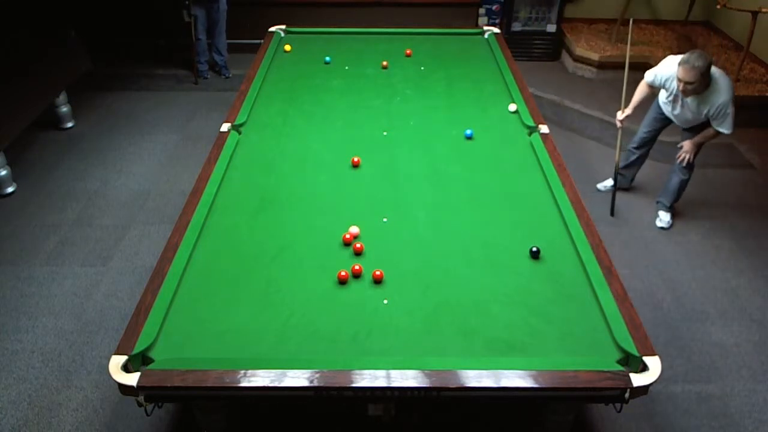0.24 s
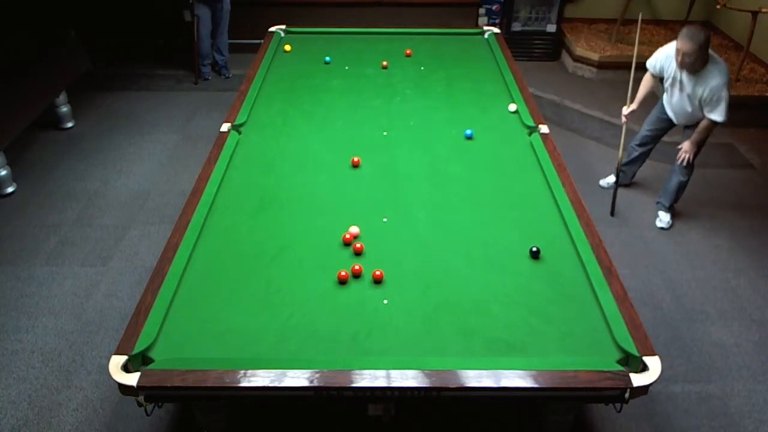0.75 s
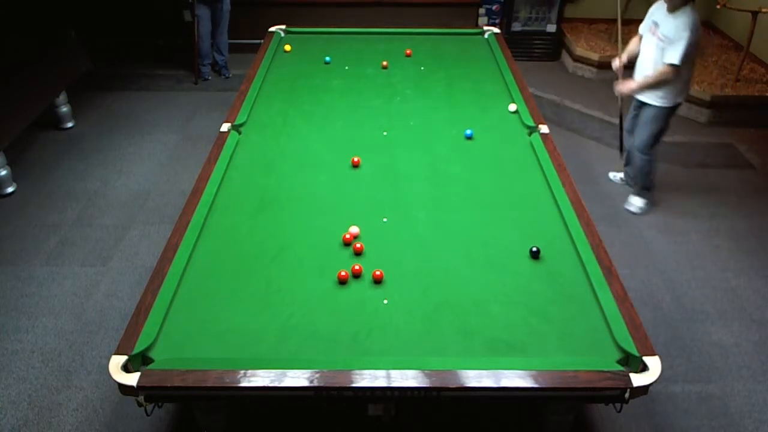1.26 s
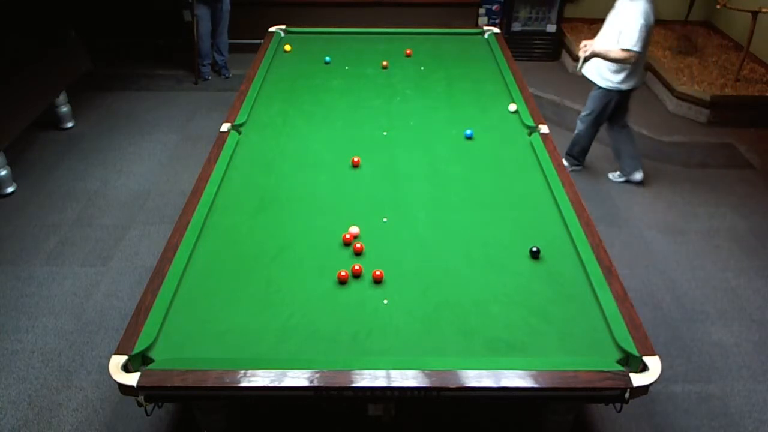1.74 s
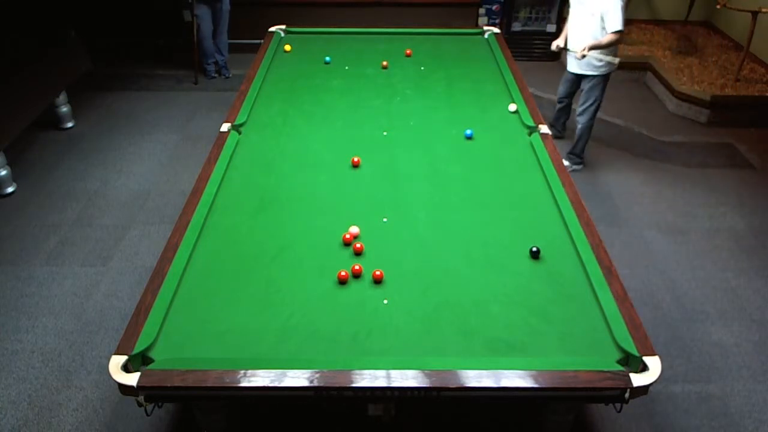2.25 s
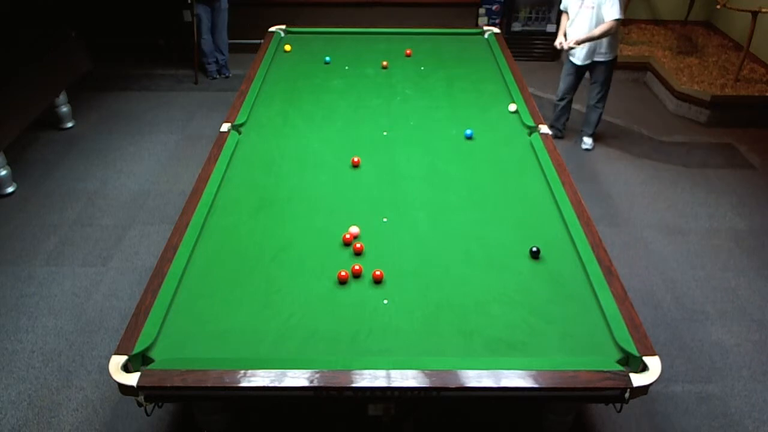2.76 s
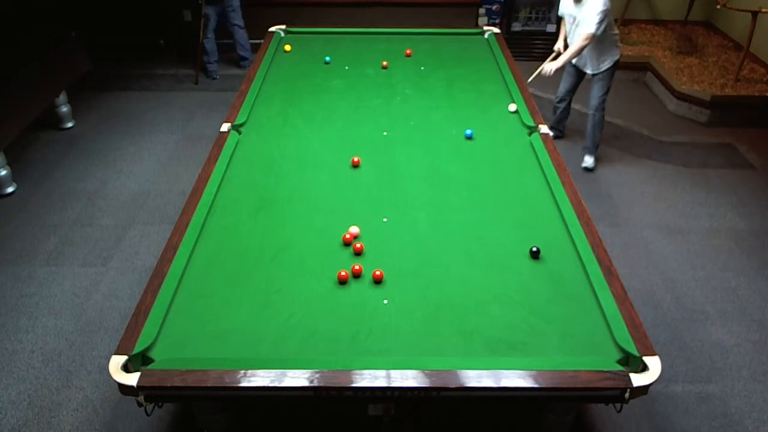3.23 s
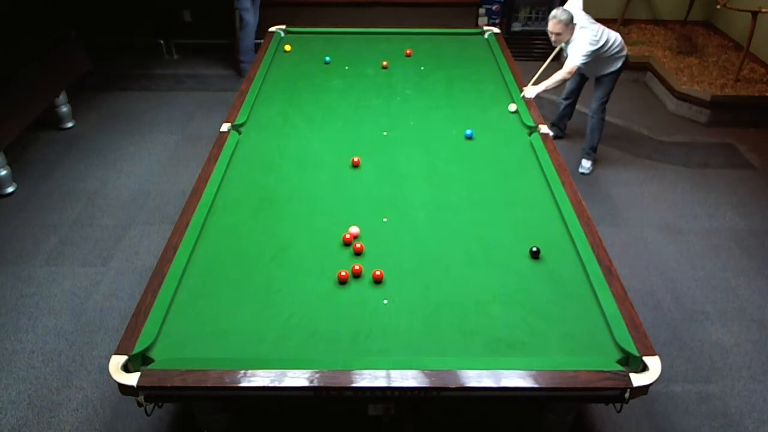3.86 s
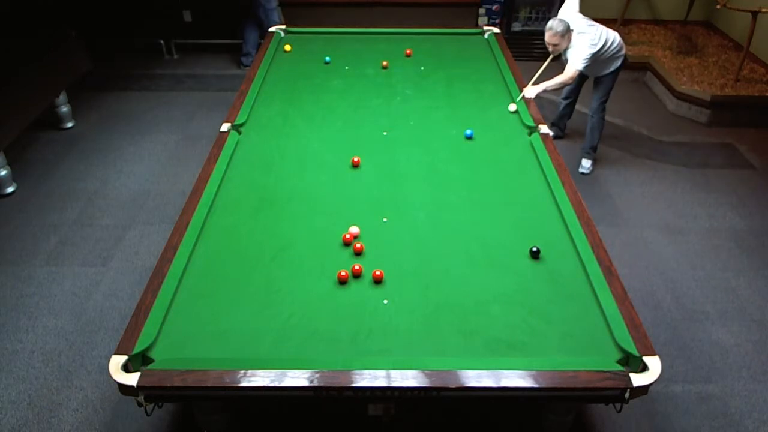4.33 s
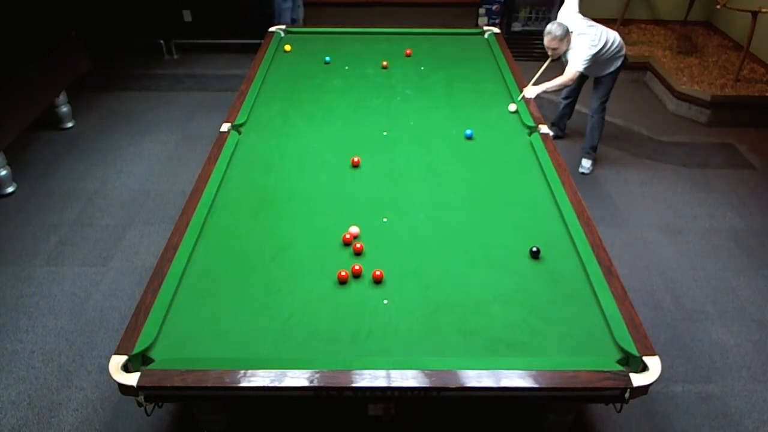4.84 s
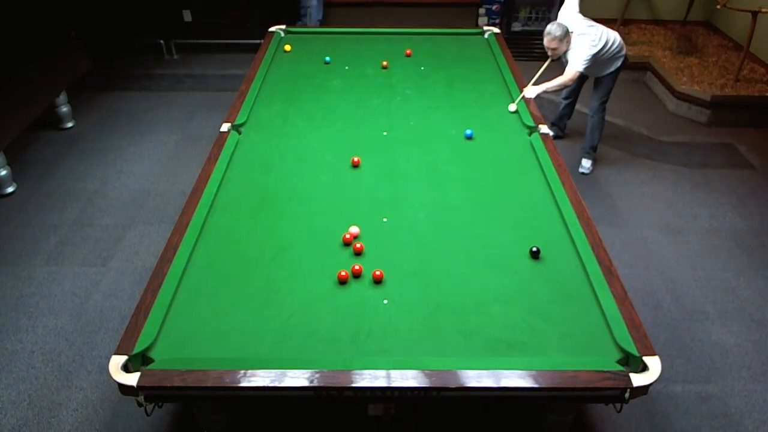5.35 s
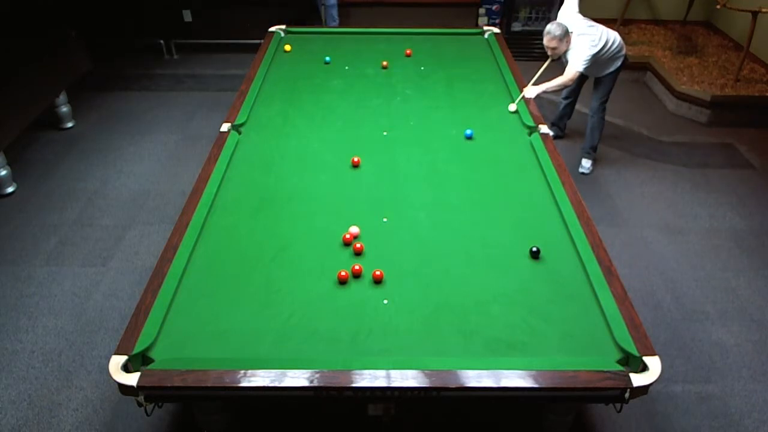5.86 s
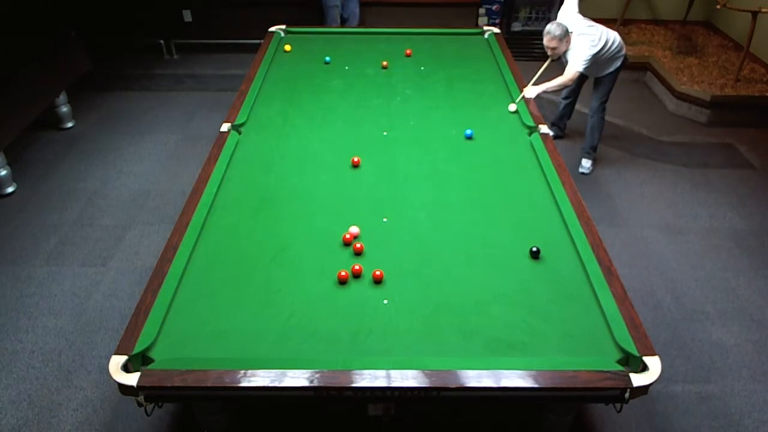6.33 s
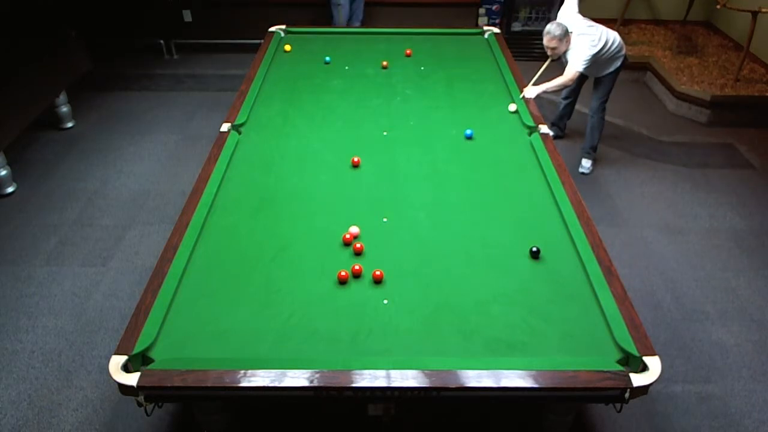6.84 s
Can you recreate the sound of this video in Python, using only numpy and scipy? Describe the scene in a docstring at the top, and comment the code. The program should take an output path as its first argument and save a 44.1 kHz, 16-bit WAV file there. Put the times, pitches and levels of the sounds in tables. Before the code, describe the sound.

Quiet snooker club with low throbbing ventilation, soft carpet footsteps and cloth rustle, then a woody cue knock and a loud sharp ball crack.

```python
"""A snooker shot in a quiet club: the cue knocks the white, which cracks into another ball an eighth of a
second later. Both contacts are short decaying modes with discrete echoes and a diffuse noise tail. Before the
shot the player walks round the table: thuds, carpet scuffs and rustling clothes (shaped noise). Ventilation
runs throughout: coloured noise and wavering tones; low throbs come and go irregularly. Swishes and a bright
hiss, both band-shaped noise, follow the shot."""
import sys
import numpy as np
from scipy import signal
from scipy.fft import rfft, irfft, next_fast_len
from scipy.io import wavfile
from scipy.ndimage import uniform_filter1d, map_coordinates

SR = 44100
rng = np.random.default_rng(int(sys.argv[2]) if len(sys.argv) > 2 else 0)


def inscribe(sig):
    """Save sig as 16-bit PCM at rate SR to the path in sys.argv[1].

    A 1-D sig is mono; a 2-D sig holds one channel per row.
    Samples are clipped to [-1, 1] before scaling.
    """
    pcm = np.round(np.clip(np.atleast_2d(sig).T, -1, 1) * 32767)
    wavfile.write(sys.argv[1], SR, pcm.astype(np.int16))


N = 312669

SUPPRESS_DB = 6.5  # greatest cut of the noise suppressor

# modes of the struck cue: (frequency [Hz], level [dB], t60 [s])
CUE_MODES = [(1096, -15, 0.15), (1389, -15.5, .13), (1920, -25, .5), (2370, -27.5, .2), (2500, -1, 0.011),
             (2820, -25.5, .15), (3620, -10, 0.0039)]


def from_db(db):
    """Decibels to amplitude gain."""
    return 10 ** (np.asarray(db) / 20)


def seconds():
    """Time of every sample."""
    return np.arange(N) / SR


def at_hz(points, hz):
    """Interpolate a table along log frequency."""
    point_hz, value = np.transpose(points)
    return np.interp(np.log(hz + 1e-3), np.log(point_hz), value)


def pan(left_right_db):
    """Gains of the two channels for a given level difference."""
    return from_db(np.array([[left_right_db], [-left_right_db]]) / 2)


def noise(colour, side_db):
    """Coloured stereo noise, steep beyond the table's ends, narrower in the treble; mid rms 1."""
    wide_below_hz = 1300
    size = next_fast_len(N)
    hz = np.arange(size // 2 + 1) * SR / size + 0.00091
    low_end = 1 + (colour[0][0] / hz) ** 8
    high_end = 1 + (hz / colour[-1][0]) ** 16
    gain = from_db(at_hz(colour, hz)) / np.sqrt(low_end * high_end)
    white = rng.standard_normal((2, size))
    mid, side = irfft(rfft(white) * gain, size)[:, :N]
    side = signal.sosfilt(signal.butter(2, wide_below_hz, fs=SR, output="sos"), side)
    return (mid + from_db(side_db) * side * [[1], [-1]]) / mid.std()


def drift(knots_per_s):
    """Random knots joined by straight lines."""
    knots = rng.standard_normal(4096)
    return map_coordinates(knots, [seconds() * knots_per_s], order=1, mode="wrap")


def by_chance(per_s, db, spread_db, hz, octaves):
    """Rows of (s, dB, Hz) at uneven intervals, scattered in level and pitch."""
    gap, loud, high = rng.uniform(-1, 1, (100, 3)).T
    top_s = np.cumsum(1 + gap / 2) / per_s
    rows = np.transpose([top_s, db + spread_db * loud, hz * 2 ** (octaves * high)])
    return rows[rows[:, 0] < N / SR]


def swells(rows, rise_s, fall_s):
    """Tones under two-sided Gaussian envelopes, from rows of (s, dB, Hz)."""
    out = np.zeros(N)
    for top_s, db, hz in rows:
        top = int(top_s * SR)
        span = np.arange(max(top - SR // 10, 0), min(top + SR // 10, N))
        age = span / SR - top_s
        swell = np.exp(-(age / np.where(age < 0, rise_s, fall_s)) ** 2)
        out[span] += from_db(db) * swell * np.cos(2 * np.pi * (hz * age + rng.random()))
    return out


def stroke(top_s, db, rise_s, fall_s):
    """Strength of a rub: Gaussian rise to its top, exponential fall."""
    age = seconds() - top_s
    return from_db(db) * np.exp(-np.where(age < 0, (age / rise_s) ** 2, age / fall_s))


def rubbing(strengths, colour, grain_db, side_db):
    """Noise with uneven grain; overlapping strokes add in power."""
    strength = np.sqrt(sum(s ** 2 for s in strengths))
    grain = from_db(grain_db * drift(250))
    return strength * grain * noise(colour, side_db)


def ventilation(waver_db):
    """Dull moving air as coloured noise, plus wavering tones and a thin whine that creeps in."""
    # air noise: (frequency [Hz], density [dB per Hz])
    air_colour = [(40,-29.5), (85,-13), (128,3), (170,-5.5), (290,-5.5), (600,-10), (1150,-17), (1450,-26),
                  (2700,-28.5), (3400,-35.5), (4200,-31), (5500,-34.5), (6200,-42.5), (9000,-48),
                  (15000,-57)]
    # wavering tones: (frequency [Hz], level [dB])
    hum_tones = [(118, -65.5), (138, -63.5), (272, -66.5), (358, -70), (550, -69.5)]
    air_db = -57.0
    whine_hz, whine_db, whine_fade_in_s = 8030, -91.5, 2.8
    t = seconds()
    out = from_db(air_db) * noise(air_colour, side_db=-14.5)
    for hz, db in hum_tones:
        level = from_db(db + waver_db * drift(8.5))
        out = out + level * np.sin(2 * np.pi * hz * t + 0.34 * drift(4.6))
    whine_level = from_db(whine_db + waver_db * drift(7.3)) * np.minimum(t / whine_fade_in_s, 1)
    out = out + whine_level * np.sin(2 * np.pi * whine_hz * t)
    return out * pan(-2.5)


def throbs():
    """Low swells at one pitch come and go unevenly: listed strong throbs, random weak ones."""
    # strong throbs: (time of top [s], level [dB])
    throb_rows = [(0.008, -32.5), (0.057, -36), (0.164, -39), (0.354, -40.5), (1.119, -39.5),
                  (1.868, -39.5), (1.91, -41), (1.982, -42), (2.202, -42.5), (2.563, -34.5), (2.609, -39),
                  (3.25, -40), (3.306, -40), (3.655, -41.5), (4.356, -40), (4.415, -36.5), (5.054, -38.5),
                  (5.159, -39), (5.555, -39.5), (5.805, -41.5), (5.854, -40.5), (6.099, -42), (6.15, -37),
                  (6.505, -37.5), (6.605, -41), (6.795, -40), (6.904, -35.5), (7.019, -40.5)]
    throb_hz, rise_s, fall_s = 127.3, 0.014, 0.011
    strong = [(top_s, db, throb_hz) for top_s, db in throb_rows]
    weak = by_chance(per_s=3, db=-51, spread_db=2, hz=throb_hz, octaves=0)
    return swells([*strong, *weak], rise_s, fall_s) * pan(-1.0)


def clothes():
    """Cloth friction: broadband noise swelling with each movement, over a faint floor."""
    # movements: (time of top [s], level [dB], length [s])
    moves = [(0.057, -72, .2), (.86, -72.5, 0.13), (1.4, -71.5, 0.33), (1.516, -67, 0.08),
             (1.82, -74.5, 0.22), (2.412, -70, 0.23), (2.75, -77.5, .2), (3.079, -71, .04),
             (3.328, -75.5, .35), (6.319, -77, .2)]
    # cloth noise: (frequency [Hz], density [dB per Hz])
    cloth_colour = [(1000, -2.5), (2500, 0), (3400, -7), (5000, -1), (7000, -10), (10000, -19.5),
                    (14000, -28.5)]
    rise_share, fall_share = 0.77, 1.4  # of a movement's length
    still_db = -83.5
    strengths = [stroke(top_s, db, rise_share * length_s, fall_share * length_s)
                 for top_s, db, length_s in moves]
    return rubbing(strengths + [from_db(still_db)], cloth_colour, grain_db=0.5, side_db=-31.5)


def scuff(top_s, db, length_s, centre_hz):
    """A sole brushes the carpet: noise in a band round its own pitch."""
    # band shape: (multiple of the centre [ratio], density [dB per Hz])
    band_shape = [(.5, -27), (.88, 0), (1.2, -3), (1.45, -23), (1.8, -50)]
    rise_share, fall_share = 0.8, 1.6  # of the scuff's length
    strength = stroke(top_s, db, rise_share * length_s, fall_share * length_s)
    colour = [(centre_hz * multiple, level_db) for multiple, level_db in band_shape]
    return rubbing([strength], colour, grain_db=1.0, side_db=-19)


def footsteps():
    """Dull thuds, mostly feet on the carpeted floor, as brief low tones; soles scuff as noise."""
    # thuds: (time of top [s], level [dB], frequency [Hz])
    thud_rows = [(0.778, -48, 350), (0.864, -45, 355), (1.438, -46, 363), (1.545, -44, 366),
                 (1.895, -42.5, 275), (2.196, -46.5, 352), (3.335, -39, 250), (3.455, -38.5, 269),
                 (4.02, -47, 279.4), (4.378, -42, 275)]
    # carpet scuffs: (time of top [s], level [dB], length [s], centre [Hz])
    scuff_rows = [(1.404, -55.5, 0.026, 1130), (1.486, -56, 0.032, 1330), (1.528, -56, .022, 1400),
                  (1.568, -56, 0.035, 1140)]
    rise_s, fall_s = 0.011, 0.023
    weak = by_chance(per_s=2.5, db=-51.5, spread_db=2, hz=261, octaves=0.35)
    thuds = swells([*thud_rows, *weak], rise_s, fall_s) * pan(-0.8)
    return thuds + sum(scuff(*row) for row in scuff_rows)


def swishes():
    """Narrow-band noise, quick to swell and slower to fade."""
    # swishes: (time of top [s], level [dB])
    swish_rows = [(6.38, -48), (6.785, -66.5)]
    # swish band: (frequency [Hz], density [dB per Hz])
    swish_colour = [(1300, -32), (1900, -2.5), (2400, 1), (2800, -5), (3500, -17.5), (4400, -30.5)]
    rise_s, fall_s = 0.018, 0.063
    strengths = [stroke(top_s, db, rise_s, fall_s) for top_s, db in swish_rows]
    return rubbing(strengths, swish_colour, grain_db=1.7, side_db=-25)


def hiss():
    """Bright noise with linear attack, short hold and Gaussian release."""
    # the hiss: (start [s], level [dB])
    start_and_level = (6.457, -46.5)
    # hiss noise: (frequency [Hz], density [dB per Hz])
    hiss_colour = [(1000, -49), (1700, -15), (2420, -2.5), (2690, -0.5), (2960, -11), (4490, 0),
                   (6380, -2.5), (6970, -9), (7890, -4), (10700, -17.5), (14000, -44)]
    attack_s, hold_s, release_s = 0.04, 0.015, 0.056
    start_s, db = start_and_level
    age = seconds() - start_s
    attack = np.clip(age / attack_s, 0, 1)
    release = np.exp(-(np.maximum(age - attack_s - hold_s, 0) / release_s) ** 2)
    return rubbing([from_db(db) * attack * release], hiss_colour, grain_db=0.5, side_db=-35)


def ring(modes, start_s, contact_s):
    """Decaying sines that swell while the contact lasts."""
    age = np.arange(SR // 2) / SR
    sound = sum(from_db(db - 60 * age / t60) * np.sin(2 * np.pi * hz * age) for hz, db, t60 in modes)
    out, first = np.zeros(N), int(start_s * SR)
    out[first:first + len(age)] = sound * (1 - np.exp(-(age / contact_s) ** 2))
    return out


def delayed(x, lag_s):
    """The same sound, later."""
    return np.interp(seconds() - lag_s, seconds(), x, left=0)


def hall(start_s, colour, side_db, build_s, hold_s, end_s, grain_db):
    """Diffuse echoes build up, hold briefly, then decay at a rate set by frequency."""
    # hall decay: (frequency [Hz], t60 [s])
    hall_t60 = [(250, 1), (700, 0.52), (1300, 0.6), (2200, 0.73), (3500, 0.48), (5000, 0.41), (6800, 0.18),
                (14000, .3)]
    wash = noise(colour, side_db)[:, :SR]
    hz, t, cells = signal.stft(wash, SR, nperseg=256)
    decay = from_db(-60 * np.maximum(t - hold_s, 0) / at_hz(hall_t60, hz)[:, None])
    tail = signal.istft(cells * decay, SR)[1][:, :SR]
    out, first = np.zeros((2, N)), int(start_s * SR)
    out[:, first:first + SR] = tail
    age = np.maximum(seconds() - start_s, 0)
    build = 1 - np.exp(-age / build_s)
    end = 1 / (1 + (age / end_s) ** 10)
    return out * build * end * from_db(grain_db * drift(500))


def blow(start_s, direct_db, modes, right_cut_db, echo_db, contact_s):
    """A contact heard direct, mostly at the left, then low-passed off the nearest surfaces."""
    # first echoes off table, lamp and walls: (delay [s], level [dB], left minus right [dB])
    first_echoes = [(.0054, -10, 1.5), (.0078, -17, 9.5), (0.0098, -8, 6), (0.0181, -16.5, 0),
                    (0.0183, -10, -2), (0.0305, -13, -4.5), (.042, -15, -5.5), (0.0491, -21, -3),
                    (0.073, -17, -1)]
    click = from_db(direct_db) * ring(modes, start_s, contact_s)
    dull = signal.sosfilt(signal.butter(4, 4800, fs=SR, output="sos"), click)
    echoes = sum(from_db(db + echo_db) * pan(left_right_db) * delayed(dull, lag_s)
                 for lag_s, db, left_right_db in first_echoes)
    return click * from_db([[0], [-right_cut_db]]) + echoes


def balls():
    """Two hard balls meet: a very short crack that fills the hall; the table bed thuds faintly."""
    # ball on ball: (time [s], direct level [dB], hall level [dB])
    contact = (5.5902, 8.5, -19.5)
    # tones of the crack: (frequency [Hz], level [dB], t60 [s])
    crack_tones = [(1300, -22, .008), (2160, -8.5, 0.0091), (2672, 0, .006), (3680, -10, .004),
                   (8070, -6.5, 0.0022), (12460, -26, 0.0012)]
    # modes of the table bed: (frequency [Hz], level [dB], t60 [s])
    bed_modes = [(189.2, -36.5, 0.12), (271, -34, 0.15), (335, -38, 0.13)]
    # crack in the hall: (frequency [Hz], density [dB per Hz])
    crack_colour = [(200,-16), (420,-26.5), (900,-5.5), (1130,-2.5), (1600,-5.5), (2100,1), (2700,0),
                    (3230,-7), (4200,-10), (5200,-20.5), (6000,-36.5), (8000,-40), (11000,-50),
                    (15000,-61.5)]
    glint_above_hz, glint_db = 6500, -9  # the glassy top also reaches the right side
    contact_s = 0.00028
    start_s, direct_db, hall_db = contact
    crack = blow(start_s, direct_db, crack_tones, right_cut_db=12.0, echo_db=-8.0, contact_s=contact_s)
    glint_modes = [mode for mode in crack_tones if mode[0] > glint_above_hz]
    glint = from_db(direct_db + glint_db) * ring(glint_modes, start_s, contact_s)
    bed = ring(bed_modes, start_s, contact_s=0.0018)
    wash = hall(start_s, crack_colour, side_db=-15, build_s=0.013, hold_s=0.032, end_s=0.34, grain_db=2.0)
    return crack + glint * [[0], [1]] + bed + from_db(hall_db) * pan(0.4) * wash


def shaft(x, width_hz, lift_db):
    """Narrow resonances at the modes of the cue."""
    peaks = [signal.iirpeak(hz, hz / width_hz, SR) for hz, _, _ in CUE_MODES]
    return from_db(lift_db) * sum(signal.lfilter(b, a, x) for b, a in peaks)


def cue():
    """The leather tip knocks woodily on the white; the shaft's modes colour the hall tail."""
    # tip on the white: (time [s], direct level [dB], hall level [dB])
    contact = (5.4688, -7.5, -27.5)
    # knock in the hall: (frequency [Hz], density [dB per Hz])
    knock_colour = [(200,-30), (400,-11.5), (640,1.5), (1060,1), (1370,-6.5), (1600,-16.5), (1930,-7.5),
                    (2150,-11.5), (2450,-12), (2900,-16), (3400,-22.5), (5170,-19.5), (8200,-34),
                    (10700,-46), (13000,-70)]
    start_s, direct_db, hall_db = contact
    knock = blow(start_s, direct_db, CUE_MODES, right_cut_db=18.5, echo_db=-9.5, contact_s=0.00046)
    wash = hall(start_s, knock_colour, side_db=-12, build_s=0.0044, hold_s=0.02, end_s=0.28, grain_db=2.0)
    wash = wash + shaft(wash, width_hz=24, lift_db=-1.5)
    return knock + from_db(hall_db) * pan(3.5) * wash


def scene():
    """The room, the player's movements, the shot, the swishes and the hiss."""
    # raised by the suppressor's greatest cut
    background = from_db(SUPPRESS_DB) * (ventilation(waver_db=2.5) + clothes())
    return background + throbs() + footsteps() + swishes() + hiss() + balls() + cue()


def suppress(x, open_db, knee_db):
    """Noise suppressor: each band opens only while well above its median level, so tails end early."""
    cells = signal.stft(x, SR, nperseg=512, noverlap=384)[2]
    power = np.mean(np.abs(cells) ** 2, axis=0)
    power = uniform_filter1d(power, size=5, axis=0)
    power = uniform_filter1d(power, size=3, axis=1)
    level_db = 10 * np.log10(np.abs(power) + 1e-20)
    above_db = level_db - np.median(level_db, axis=1, keepdims=True)
    shut = 0.5 - 0.5 * np.tanh((above_db - open_db) / knee_db)  # 0 open, 1 shut
    held_down = cells * from_db(-SUPPRESS_DB * shut)
    return signal.istft(held_down, SR, nperseg=512, noverlap=384)[1][:, :N]


def record(dry):
    """Suppress steady background, clip overloads, cut the deep bass and the top."""
    cutoff_hz = 15750
    clipped = np.clip(suppress(dry, open_db=7.0, knee_db=5.0), -1, 1)
    lean = signal.sosfilt(signal.butter(2, 45, "high", fs=SR, output="sos"), clipped)
    return signal.sosfilt(signal.ellip(10, 0.1, 80, cutoff_hz, fs=SR, output="sos"), lean)


dry = scene()
out = record(dry)
inscribe(out)
```